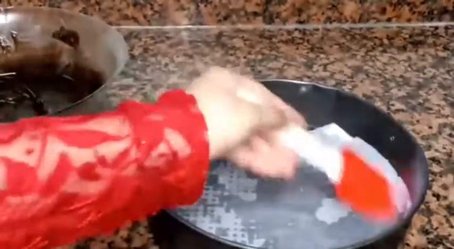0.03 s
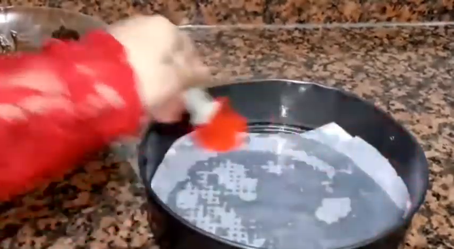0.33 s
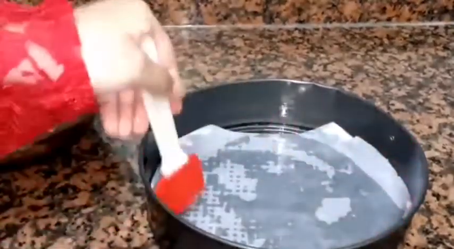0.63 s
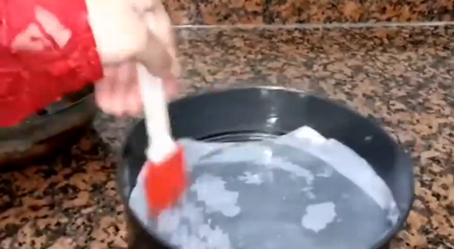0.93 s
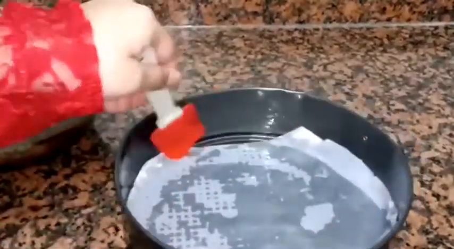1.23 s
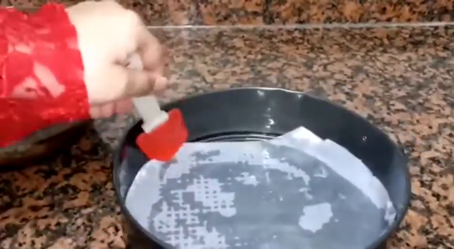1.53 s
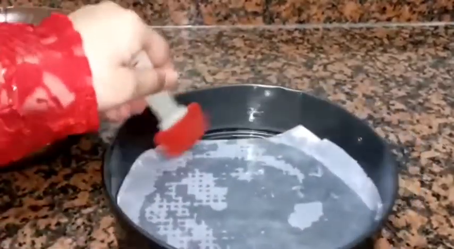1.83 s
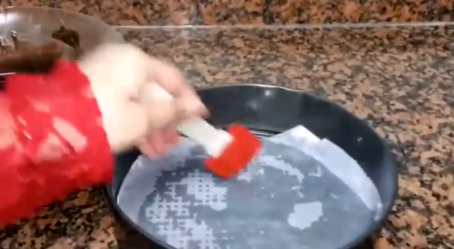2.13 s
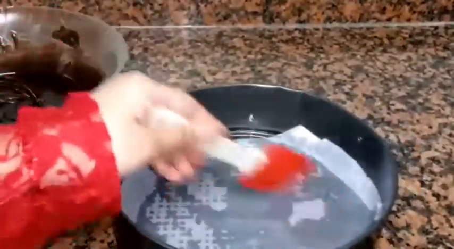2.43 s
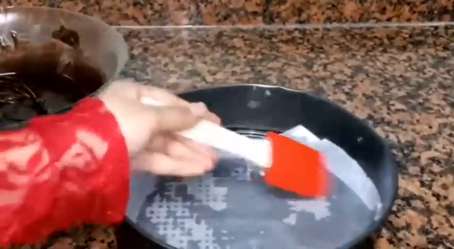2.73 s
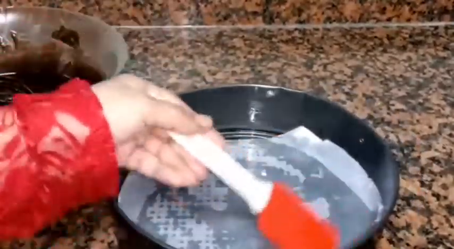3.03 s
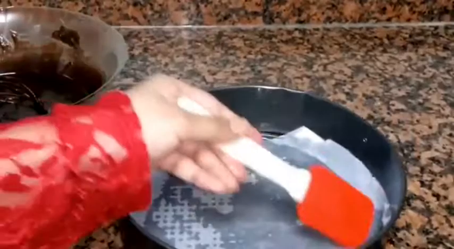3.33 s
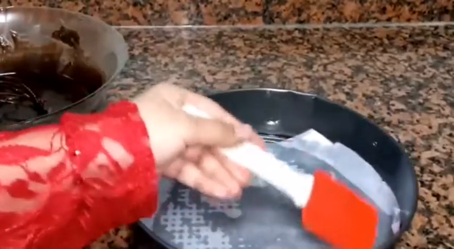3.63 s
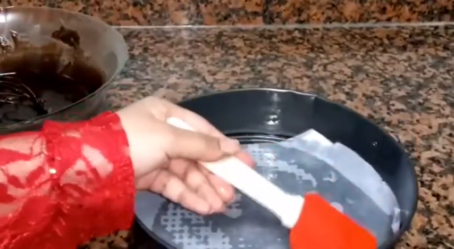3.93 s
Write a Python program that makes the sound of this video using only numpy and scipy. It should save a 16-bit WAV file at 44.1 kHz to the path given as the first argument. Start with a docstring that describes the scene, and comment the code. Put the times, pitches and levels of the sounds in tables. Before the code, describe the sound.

A spatula swishes softly over greased baking paper in a metal cake pan. The pan knocks on the counter at 0.6 seconds, and the blade judders against its wall around 0.9. Crisp paper snaps follow from 1.2 to 2.1 seconds, loudest near 1.7, with another knock. Quieter dabs and swishes continue, with light ringing knocks from 3.3 to 3.9, over faint sleeve rustle, kitchen rumble and an appliance hum.

```python
"""Lining a cake pan

A silicone spatula presses greased baking paper into a metal cake pan on a stone counter. The blade
swishes and dabs, the paper snaps, the nudged pan knocks on the counter and the blade judders along
its wall. The pan rings and a small hard kitchen answers, over a sleeve's rustle, a low rumble and
an appliance hum."""
import sys
import numpy as np
from scipy import signal
from scipy.fft import rfft, irfft, next_fast_len
from scipy.io import wavfile
from scipy.ndimage import uniform_filter1d

SR = 44100
rng = np.random.default_rng(int(sys.argv[2]) if len(sys.argv) > 2 else 0)


def bounce(signal):
    """Save signal as a 16-bit WAV file at the path given by the first command-line argument."""
    frames = np.transpose(np.atleast_2d(signal))
    limited = np.clip(frames, -1, 1)
    pcm = np.round(limited * 32767).astype(np.int16)
    wavfile.write(sys.argv[1], SR, pcm)


N = 176400


def amp(db):
    """Decibels to gain."""
    return 10 ** (np.asarray(db) / 20)


def unit(x):
    """Scale to rms 1."""
    return x / np.sqrt(np.mean(x ** 2) + 1e-20)


def read(points, hz):
    """Interpolate a table over log frequency."""
    point_hz, value = np.transpose(points)
    return np.interp(np.log(hz + 1), np.log(point_hz), value)


def add(mix, start_s, sound):
    """Mix a sound in at start_s."""
    at = round(start_s * SR)
    sound = sound[max(-at, 0):]
    part = mix[max(at, 0):][:len(sound)]
    part += sound[:len(part)]


def colour(x, spectrum, shelves=((1, 0), (2, 0)), size=2048):
    """Minimum-phase filter: a unit-power spectrum times shelves, both as (Hz, dB) points."""
    hz = np.fft.rfftfreq(size, 1 / SR)
    log_gain = np.log(unit(amp(read(spectrum, hz))) * amp(read(shelves, hz)))
    mirrored = np.r_[log_gain, log_gain[-2:0:-1]]
    impulse = np.fft.ifft(np.exp(np.conj(signal.hilbert(mirrored)))).real
    return signal.fftconvolve(x, impulse[:size // 2])


def burst(envelope):
    """Dense clicks under an envelope, with an even spectrum."""
    x = rng.standard_normal(len(envelope)) * envelope
    for _ in range(3):  # whiten, then restore the envelope
        z = rfft(x)
        x = irfft(z / (abs(z) + 1e-12), len(x))
        x *= envelope / np.sqrt(abs(uniform_filter1d(x ** 2, size=45)) + 1e-12)
    return x


def background(air_db=-53, patch_db=2):
    """Room rumble with faint hiss, plus an appliance's hum."""
    # Room rumble and faint hiss, with the microphone's dip near 13 kHz and lift near 15 kHz.
    # Each row: frequency in Hz, density in dB.
    air_spectrum = [(24, -35), (36, -6), (65, -3.5), (100, -5), (135, 1.5), (200, -2), (255, -4.5),
                    (320, -7.5), (420, -22), (630, -20), (800, -23.5), (1500, -25), (3200, -37),
                    (6000, -34.5), (9500, -44), (13000, -58), (15300, -39)]
    # Hum partials. Each row: frequency in Hz, level in dB.
    partials = [(49.4, -64.5), (116.4, -61.5), (232.6, -62), (298, -72)]
    hz, t = np.fft.rfftfreq(2048, 1 / SR), np.arange(N) / SR
    real, imag, patches = rng.standard_normal((3, N // 512 + 5, len(hz)))
    patches = uniform_filter1d(patches, size=8, axis=0)
    patches = unit(uniform_filter1d(patches, size=10, axis=1))
    z = (real + 1j * imag) * amp(read(air_spectrum, hz) + patch_db * patches)
    air = unit(signal.istft(z.T, nperseg=2048, noverlap=1536)[1][:N])
    hum = sum(np.sqrt(2) * amp(db) * np.sin(2 * np.pi * (f * t + rng.random())) for f, db in partials)
    return amp(air_db) * air + hum


def sleeve(swing_db=3, step_s=0.05):
    """Cloth and hand rustle dully and unevenly as the arm moves."""
    # Cloth. Each row: frequency in Hz, density in dB.
    cloth_spectrum = [(150, -20.5), (340, -4), (500, -0.5), (680, -0.5), (1000, -13), (2500, -29)]
    # Rustle contour. Each row: time in seconds, level in dB.
    contour = [(0, -70), (.16, -61.5), (.33, -68), (.55, -67), (.8, -64.5), (1.27, -63.5), (1.4, -71),
               (2.05, -62.5), (2.33, -64), (2.5, -72), (3.23, -69), (3.35, -61), (3.55, -68), (3.95, -63.5)]
    t, knots_s = np.arange(N) / SR, np.arange(0, N / SR + 1, step_s)
    motion = np.interp(t, knots_s, rng.uniform(-1, 1, 800)[:len(knots_s)])
    cloth = colour(rng.standard_normal(N), cloth_spectrum)[:N]
    rustle = unit(cloth * amp(swing_db * unit(motion)))
    return rustle * amp(np.interp(t, *np.transpose(contour)))


def paper_colour(x, body_db, sheen_db, reach):
    """Paper timbre: body shelf below 1.5 kHz, sheen at 9.5 kHz, reach times the sheen from 14 kHz."""
    # Baking paper's crackle, with the microphone's dip near 13 kHz and lift near 15 kHz.
    # Each row: frequency in Hz, density in dB.
    paper_spectrum = [(150, -18), (500, -9), (1000, -9), (2000, -3.5), (2700, 1), (3500, -1), (4600, 2),
                      (5600, 1), (6700, 2.5), (8100, -5), (9400, -0.5), (10700, -12), (13300, -22),
                      (15000, -10.5)]
    shelves = [(1500, body_db), (3200, 0), (6000, 0), (9500, sheen_db), (14000, reach * sheen_db)]
    return colour(x, paper_spectrum, shelves)


def grease(x, patch_db=3.6, patch_hz=700, patch_s=0.012, flutter_db=1.2):
    """Grease grips and lets go: resonant patches come and go, and the level flutters."""
    z = signal.stft(x, nperseg=256, noverlap=192)[2]
    patches = rng.standard_normal(z.shape)
    patches = uniform_filter1d(patches, round(patch_hz * 256 / SR), axis=0)
    patches = uniform_filter1d(patches, round(patch_s * SR / 64), axis=1)
    flutter = unit(uniform_filter1d(rng.standard_normal(z.shape[1]), size=4))
    gain = unit(amp(patch_db * unit(patches) + flutter_db * flutter))
    return signal.istft(z * gain, nperseg=256, noverlap=192)[1][:len(x)]


def stroke(swell_s, fade_s, level_db, body_db, sheen_db, size=20000):
    """The blade drags the paper: many tiny slips swell and fade."""
    slips_per_s, scatter_db, smooth_share = 2000, 5, 0.63
    t = np.arange(size) / SR
    slips = rng.standard_normal(size) * amp(scatter_db * np.minimum(rng.exponential(1, size), 4))
    slips *= rng.random(size) < slips_per_s / SR
    friction = np.sqrt(smooth_share) * rng.standard_normal(size)
    friction += np.sqrt(1 - smooth_share) * unit(slips)
    pressure = np.clip(np.minimum(t / swell_s, 1 - (t - swell_s) / fade_s), 0, 1) ** 0.45
    return amp(level_db) * paper_colour(grease(friction) * pressure, body_db, sheen_db, reach=1.7)


def dab(level_db, rise_s, decay_s, centre_hz, width_oct, size=8192):
    """The soft blade rubs briefly on greased metal: a rounded rasp in one broad resonance."""
    skirt_db, silicone_cutoff_hz = 27, 5250
    t, hz = np.arange(size) / SR, np.geomspace(60, 16000, 40)
    bell_db = -skirt_db * np.log10(1 + (np.log2(hz / centre_hz) / width_oct) ** 2)
    bell_db -= 20 * np.log10(1 + (hz / silicone_cutoff_hz) ** 4)
    envelope = (1 - np.exp(-t / rise_s)) * np.exp(-t / decay_s)
    return amp(level_db) * colour(burst(envelope / envelope.max()), np.c_[hz, bell_db])


def snap(level_db, decay_s, body_db, sheen_db, size=2048):
    """A crease gives way: a sharp tick, a fast-dying crackle and a brief ring of the sheet."""
    # Taut paper's modes. Each row: frequency in Hz, level in dB.
    sheet_modes = [(2750, -2.5), (3200, -5.5), (4065, 6.5), (5130, 12), (5590, 18), (5872, 17), (6510, 12),
                   (7702, 5.5), (9460, 0.5)]
    rise_s, tick_s, ring_db, ring_t60_s = 0.00021, 0.00074, -22.5, 0.018
    t = np.arange(size) / SR
    crackle = burst((1 - np.exp(-t / rise_s)) * np.exp(-t / decay_s))
    tick = 0.85 * np.linalg.norm(crackle) * min(tick_s / decay_s, 1)  # weaker in long snaps
    crackle[np.argmax(t > rise_s)] -= tick
    sound = paper_colour(0.97 * crackle, body_db, sheen_db, reach=0.75)
    ring = sum(amp(db) * np.sin(2 * np.pi * (hz * t + rng.random())) for hz, db in sheet_modes)
    add(sound, 0, ring * amp(ring_db - 60 * t / ring_t60_s))
    return amp(level_db) * sound


def knock(level_db, hardness_db, rise_s, size=4096):
    """The pan's base meets the stone: a short clack, coloured anew by each place of contact."""
    # Metal-on-stone clack, with the microphone's dip near 13 kHz and lift near 15 kHz.
    # Each row: frequency in Hz, density in dB.
    clack_spectrum = [(100, -38.5), (400, -2), (750, -2), (1000, 2.5), (1750, 1), (2100, -10), (2600, -8.5),
                      (3700, -13.5), (4400, -11.5), (6800, -14), (7800, -20.5), (9600, -20), (12500, -43),
                      (15500, -23)]
    clack_s, crack_s, ripple_db = 0.0086, 0.0027, 4
    t, hz = np.arange(size) / SR, np.geomspace(400, 8000, 44)
    treble_db = read([(1700, 0), (3500, hardness_db)], hz)
    ripple = amp(ripple_db * (-1) ** np.arange(len(hz)) * rng.random(len(hz)))
    contact_db = 20 * np.log10(unit(ripple))
    envelope = 0.73 * (1 - np.exp(-t / rise_s)) * (np.exp(-t / clack_s) + np.exp(-t / crack_s))
    impact = burst(envelope)
    shelves = np.c_[hz, treble_db + np.roll(contact_db, rng.integers(2))]
    return amp(level_db) * colour(impact, clack_spectrum, shelves)


def struck_spot(level_db, rise_s, pitch_hz, decay_s=0.013, size=4096):
    """The struck spot rings for a moment, damped by counter and paper."""
    t = np.arange(size) / SR
    envelope = (1 - np.exp(-t / rise_s)) * np.exp(-t / decay_s)
    return amp(level_db) * envelope * np.sin(2 * np.pi * (pitch_hz * t + rng.random()))


def judder(level_db, rise_s, decay_s, median_slips_per_s=900, size=8192):
    """The blade sticks and slips in quick uneven steps that ring the pan's wall."""
    # Wall resonances. Each row: frequency in Hz, width in Hz, gain in dB.
    wall_modes = [(1783, 54, 2.5), (2470, 190, -2), (2720, 140, 0), (3010, 300, 1), (3330, 150, -2),
                  (4330, 130, -2), (6750, 240, -4)]
    t, f = np.arange(size) / SR, np.fft.rfftfreq(size, 1 / SR)
    pace = np.repeat(np.exp(0.55 * rng.standard_normal(size)), 32)[:size]
    cycles = np.cumsum(pace) * median_slips_per_s / SR
    envelope = (1 - np.exp(-t / rise_s)) * np.exp(-t / decay_s)
    slips = burst(unit((1 - cycles % 1) ** 2) * envelope / envelope.max())
    wall = sum(amp(db) / (1 + 2j * (f - hz) / width_hz) for hz, width_hz, db in wall_modes)
    wall /= np.sqrt(np.mean(abs(wall) ** 2))
    return amp(level_db) * irfft(rfft(slips) * wall, size)


def pan_ring(x):
    """The pan's modes ring as x shakes it."""
    # Pan modes. Each row: frequency in Hz, gain in dB, T60 in seconds.
    pan_modes = [(476, -2, 0.26), (559, -8, 0.26), (682, -7, 0.25), (886.8, 0.5, 0.15), (971, -5, 0.2),
                 (1018, 4.5, 0.26), (1103, -6, 0.18), (1147, -4.5, 0.22), (1236, -1, 0.43),
                 (1316, -5.5, 0.27), (1682, -4, 0.096), (1724, -4.5, 0.37), (2400, -5, 0.13),
                 (2710, -13, 0.46)]
    size = next_fast_len(N + SR)
    f = np.fft.rfftfreq(size, 1 / SR)
    response = sum(amp(db) / (1 + 2j * np.pi * (f - hz) * t60_s / np.log(1000))
                   for hz, db, t60_s in pan_modes)
    return irfft(rfft(x, size) * response, size)[:N]


def kitchen(x, build_s=0.0048, size=26000):
    """Dense reflections build up briefly and die faster in the treble."""
    # Room decay. Each row: frequency in Hz, T60 in seconds.
    decay_times = [(150, 0.81), (500, 0.52), (1200, 0.4), (3000, 0.34), (6000, 0.35), (10000, 0.2),
                   (15000, 0.31)]
    hz, t, z = signal.stft(burst(np.ones(size)), SR, nperseg=256)
    decay = amp(-60 * t / read(decay_times, hz)[:, None])
    tail = signal.istft(z * decay, SR, nperseg=256)[1]
    tail *= 1 - np.exp(-(np.arange(len(tail)) / SR / build_s) ** 2)
    return signal.fftconvolve(x, tail / np.linalg.norm(tail))[:N]


def scene():
    """Strokes, dabs, snaps, knocks and judders shake the pan and sound in the kitchen."""
    # Blade drags paper. Each row: start, swell and fade in seconds, then level, body and sheen in dB.
    stroke_events = [(-.03, 0.07, 0.2, -57, 6, -1.5), (0.171, 0.091, 0.056, -51.5, 8, -1.5),
                     (0.341, 0.021, 0.12, -70, 7, 15.5), (0.391, 0.084, 0.073, -57, 7, 3),
                     (0.563, 0.014, 0.027, -55, 1, 3), (0.744, 0.013, 0.033, -58.5, 7, 1.5),
                     (0.7951, 0.0038, 0.011, -30.5, -3, -3.5), (0.806, 0.013, 0.045, -48, 12, 3),
                     (.892, 0.02, 0.029, -45.5, -5, -9), (.915, 0.017, 0.11, -49, 10.5, -1),
                     (1.203, .012, 0.0097, -43, 7, 4), (1.281, 0.063, 0.041, -57, 0.5, 1.5),
                     (1.383, 0.019, 0.0072, -56, -7, 3), (1.515, 0.0041, 0.01, -42, 3, -7),
                     (1.525, 0.014, 0.022, -43, 3.5, 3), (1.59, 0.049, 0.026, -53.5, -8, 0.5),
                     (1.763, 0.0017, 0.02, -38.5, 3.5, -6), (1.966, 0.027, 0.029, -53, 2, 5),
                     (2.058, 0.017, 0.047, -55, 5, 4.5), (2.27, 0.046, 0.1, -59.5, 6.5, 4),
                     (2.421, 0.048, 0.017, -58.5, 10.5, 5.5), (2.504, 0.011, 0.014, -54, 12, 6),
                     (2.55, 0.07, 0.037, -62.5, -2, -10), (2.596, 0.01, 0.021, -53, -6, -3.5),
                     (2.899, 0.045, 0.028, -66, 0, 2), (2.969, 0.066, 0.078, -65.5, 6, 1.5),
                     (3.201, 0.039, 0.056, -55, 9.5, 0), (3.419, 0.042, 0.03, -60.5, 12, -1.5),
                     (3.49, 0.043, 0.092, -54, 7, -0.5), (3.639, 0.067, 0.18, -65, 12.5, 2.5),
                     (3.801, 0.09, 0.24, -67.5, 2, -1)]
    # Greasy blade dabs. Each row: start in seconds, level in dB, rise and decay in seconds,
    # centre in Hz, width in octaves.
    dab_events = [(0.1614, -48, 0.00083, 0.013, 1060, 0.85), (.799, -41, 0.0013, 0.0038, 1500, 1.5),
                  (1.222, -57.5, .004, 0.021, 730, 0.23), (1.25, -57.5, 0.0036, .018, 1260, 0.17),
                  (2.227, -58, 0.0034, 0.019, 1010, 0.55), (2.285, -57.5, 0.0035, 0.024, 1380, 0.74),
                  (2.513, -54, 0.0041, 0.015, 1140, 0.31), (2.53, -61.5, .004, 0.02, 1970, 0.26),
                  (2.576, -57, 0.01, 0.018, 1590, 1.1), (2.900, -48, 0.0032, 0.014, 1280, 1.6),
                  (2.926, -57.5, 0.0036, 0.02, 1450, 1.8), (3.054, -63.5, 0.0071, 0.018, 2440, 0.18),
                  (3.152, -55, 0.0015, .012, 2050, 0.56), (3.170, -54.5, 0.0018, 0.021, 1110, 1.05),
                  (3.239, -54.5, 0.014, 0.014, 3080, 0.76), (3.445, -59, 0.0051, 0.0081, 2640, 0.34),
                  (3.486, -50.5, 0.0012, 0.012, 1030, 0.33), (3.71, -61, 0.0065, 0.0073, 2170, 0.32)]
    # Paper snaps. Each row: start in seconds, level in dB, decay in seconds, body and sheen in dB.
    snap_events = [(0.455, -48.5, 0.0079, -19, 12.5), (0.467, -51.5, 0.0037, -12, 23.5),
                   (.502, -39, 0.00077, -7, -8), (0.775, -47, 0.0034, 4, 12), (0.791, -40, 0.0037, 5, 2),
                   (.801, -33, 0.0017, 6, -18), (.855, -45.5, 0.0026, -8, 17.5),
                   (0.94, -42, 0.0038, 0, -14), (0.949, -45, 0.0066, 12, 8.5),
                   (1.2087, -31.5, 0.0029, -51, 4.5), (1.217, -42.5, 0.0022, -9, 16.5),
                   (1.492, -45, 0.013, 5.5, -11), (1.523, -36, 0.0053, -24, 3),
                   (1.5345, -32.5, 0.0036, -5, 7.5), (1.6557, -45, 0.0022, -19, 9),
                   (1.6707, -32, 0.0021, -17, 2), (1.6724, -16.5, 0.001, -7, 9),
                   (1.6752, -22.5, 0.0024, -1, -3), (1.764, -37, .002, -10, 4),
                   (1.7683, -34.5, 0.0023, -17, 17), (1.7794, -22, 0.0016, 3, 4.5),
                   (1.7821, -37.5, 0.023, 10.5, -17), (1.842, -33, 0.0013, 6, 7),
                   (1.868, -28.5, 0.0021, -22, -7), (1.87, -39, 0.0014, -10, -7),
                   (1.871, -34.5, 0.0016, 2, 13.5), (1.9805, -36, 0.00098, -47, 2.5),
                   (2.003, -44.5, 0.0018, -5, 6), (2.073, -41, 0.0037, -23, 2.5),
                   (3.555, -56, 0.0045, -4, 26), (3.561, -38.5, 0.0018, -10, -8)]
    # Pan hits counter. Each row: start in seconds, level and treble hardness in dB, rise in seconds,
    # struck spot's pitch in Hz, its relative level in dB.
    knock_events = [(.6103, -35.5, 4, 0.00052, 1060, 3.5), (0.635, -39, 4, 0.00088, 1134, 0),
                    (1.5982, -37.5, -13, 0.0013, 1024, -8), (1.8323, -29.5, 3, 0.00049, 1335, -4),
                    (1.854, -45.5, -12, 0.0016, 888, 12), (1.975, -43.5, -13, 0.0017, 1070, -7),
                    (2.218, -52, 8, .0015, 740, 4), (2.9004, -45, -0.5, 0.0016, 1610, -9),
                    (3.3088, -32.5, 5.5, 0.0013, 1360, -3.5), (3.318, -37.5, -10, 0.002, 1270, 0.5),
                    (3.346, -38.5, -1, 0.00092, 1310, -9), (3.5863, -39, 3, 0.00061, 1650, -2),
                    (3.612, -45, -17, 0.002, 890, 1), (3.8207, -39, -4, 0.0027, 1027, -4),
                    (3.847, -41.5, 0.5, 0.0013, 1754, -3)]
    # Blade judders on the wall. Each row: start in seconds, level in dB, rise and decay in seconds.
    judder_events = [(0.791, -43, .002, 0.0048), (.799, -38, 0.0014, 0.0042), (.891, -42, 0.0037, .012),
                     (0.904, -43, 0.00088, 0.0033), (0.926, -54, .003, 0.01),
                     (0.9392, -41.5, 0.001, 0.0059), (.992, -59, 0.0043, 0.013)]
    # The pan's hollow. Each row: frequency in Hz, gain in dB.
    hollow = [(400, 0.5), (480, 2), (570, -2.5), (705, 3.5), (915, -2.5), (1130, 3), (1400, -2.5),
              (1660, 1.5), (1830, 0), (3200, 0), (3600, 1), (4140, 2), (4400, 0)]
    knocks, spots, rubs, snaps, strokes = np.zeros((5, N))
    air = colour(background() + sleeve(), hollow)[:N]
    for start_s, level_db, hardness_db, rise_s, spot_hz, spot_db in knock_events:
        add(knocks, start_s, knock(level_db, hardness_db, rise_s))
        add(spots, start_s, struck_spot(level_db + spot_db, rise_s, spot_hz))
    for start_s, *row in dab_events:
        add(rubs, start_s, dab(*row))
    for start_s, *row in judder_events:
        add(rubs, start_s, judder(*row))
    for start_s, *row in snap_events:
        add(snaps, start_s, snap(*row))
    for start_s, *row in stroke_events:
        add(strokes, start_s, stroke(*row))
    strokes = colour(strokes, hollow)[:N]
    ring = pan_ring(amp(-5) * air + amp(9) * knocks + amp(0.5) * (rubs + snaps + strokes))
    send = amp(-0.5) * knocks + amp(-8.5) * snaps + amp(-4.5) * (strokes + rubs) + amp(-16) * ring
    return (knocks + spots + ring + rubs + snaps + strokes + kitchen(send) + air)[None]


def record(dry):
    """Low cut and band limit."""
    low_hz, high_hz = 38, 15500
    low_cut = signal.butter(4, low_hz, "highpass", fs=SR, output="sos")
    band_limit = signal.firwin(401, high_hz, window=("kaiser", 8), fs=SR)
    return signal.oaconvolve(signal.sosfilt(low_cut, dry), band_limit[None], "same")


dry = scene()
out = record(dry)
bounce(out)
```